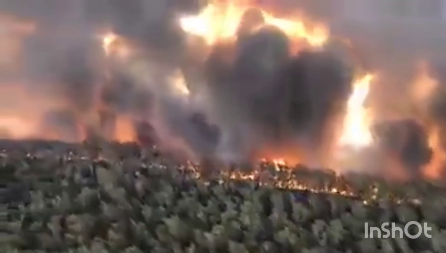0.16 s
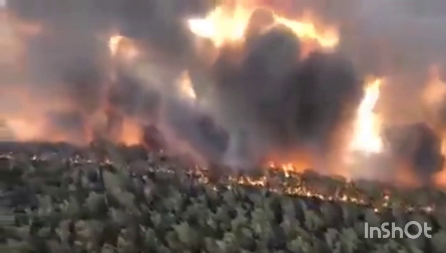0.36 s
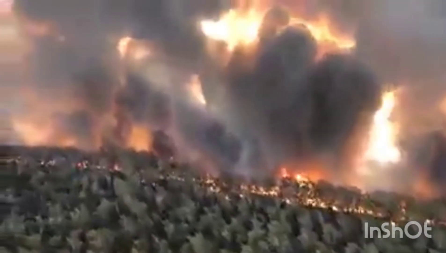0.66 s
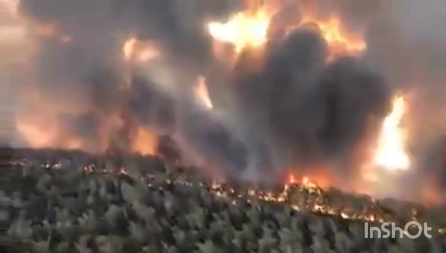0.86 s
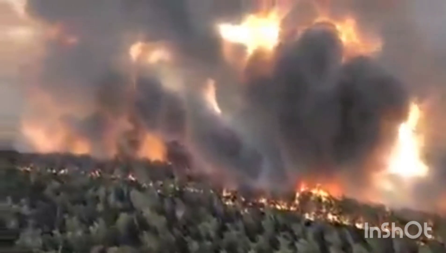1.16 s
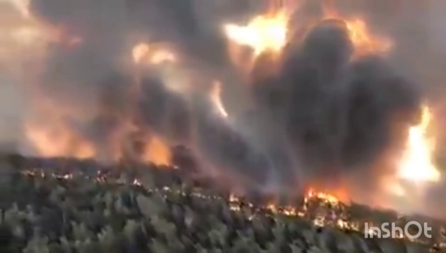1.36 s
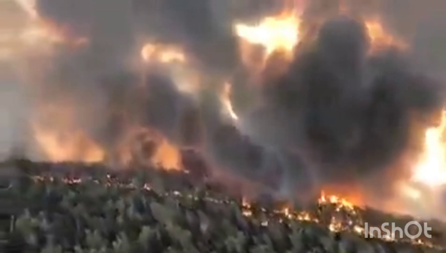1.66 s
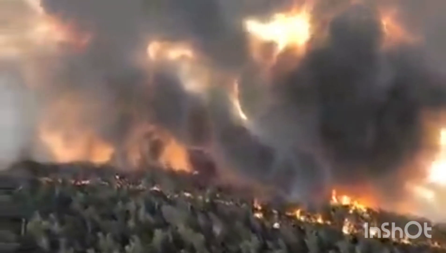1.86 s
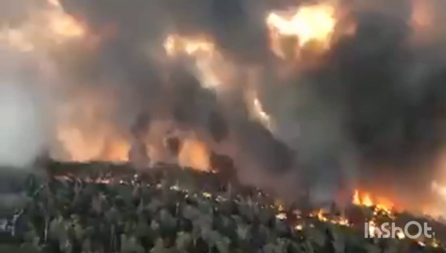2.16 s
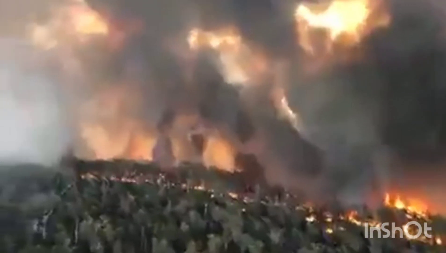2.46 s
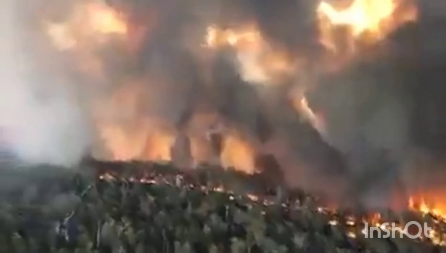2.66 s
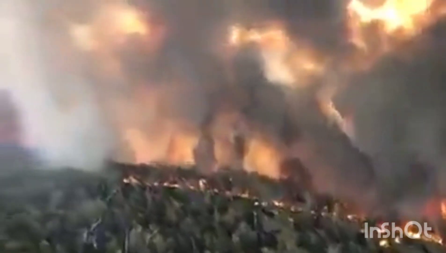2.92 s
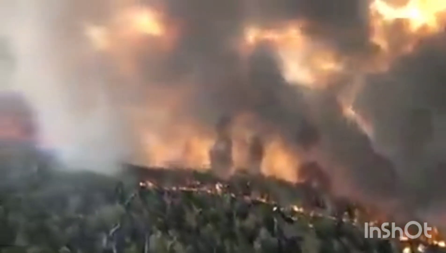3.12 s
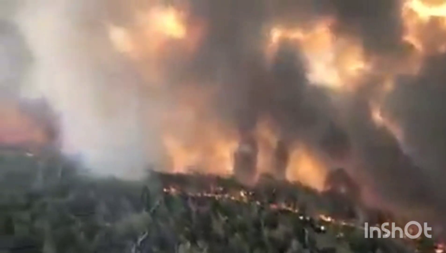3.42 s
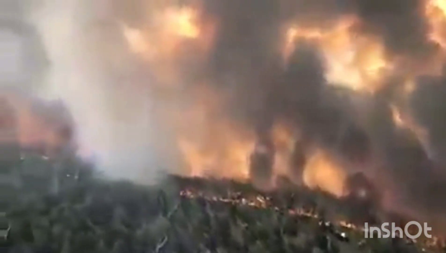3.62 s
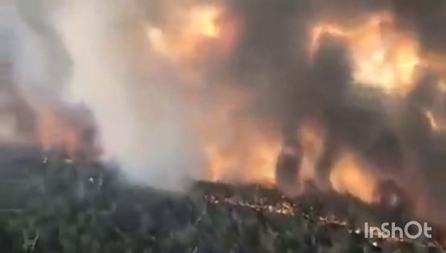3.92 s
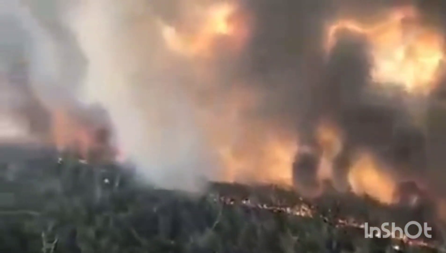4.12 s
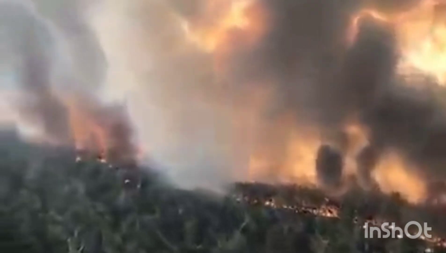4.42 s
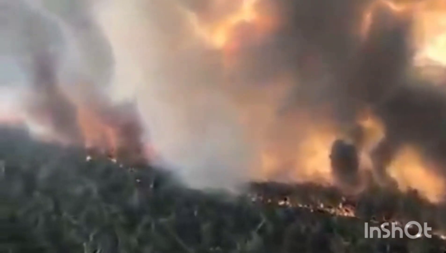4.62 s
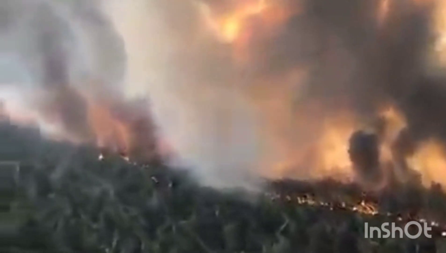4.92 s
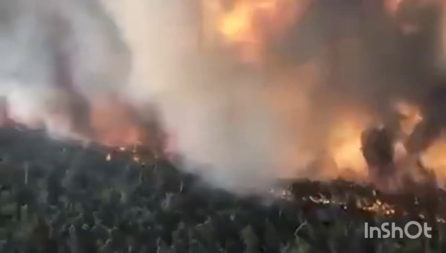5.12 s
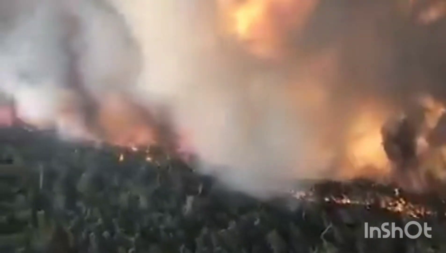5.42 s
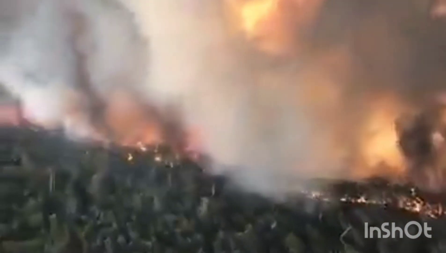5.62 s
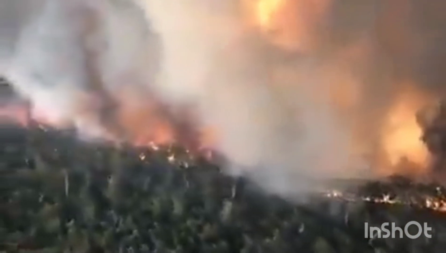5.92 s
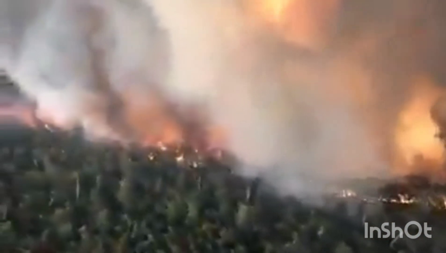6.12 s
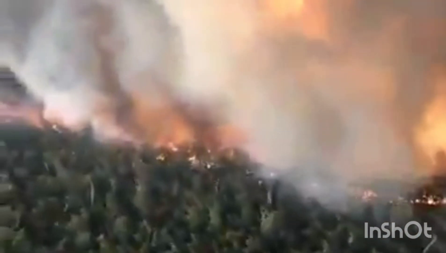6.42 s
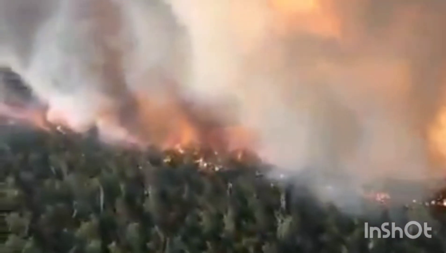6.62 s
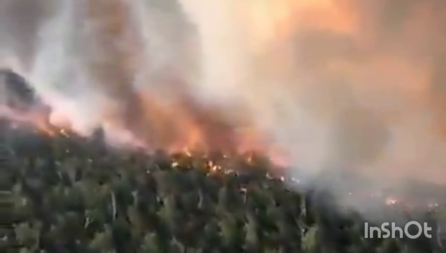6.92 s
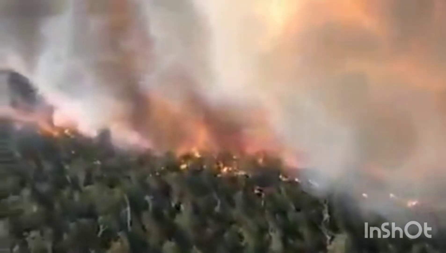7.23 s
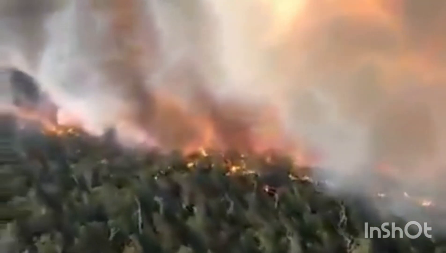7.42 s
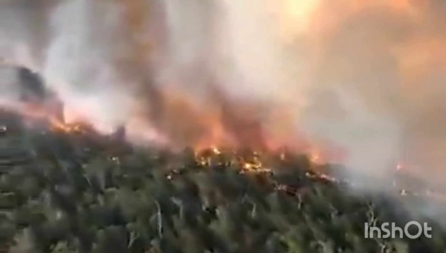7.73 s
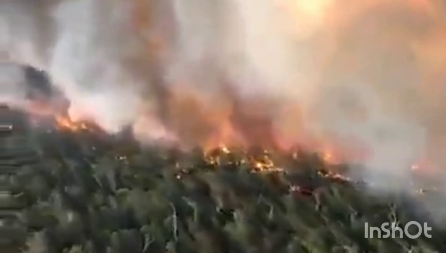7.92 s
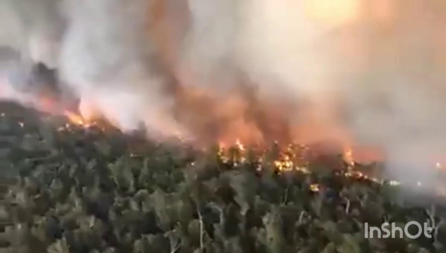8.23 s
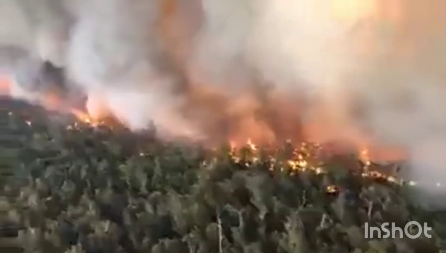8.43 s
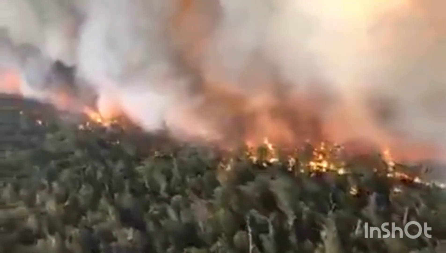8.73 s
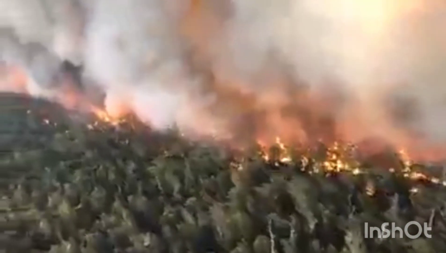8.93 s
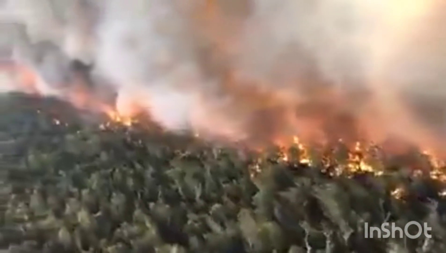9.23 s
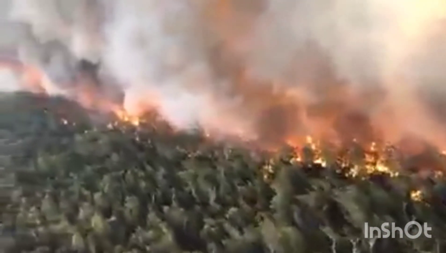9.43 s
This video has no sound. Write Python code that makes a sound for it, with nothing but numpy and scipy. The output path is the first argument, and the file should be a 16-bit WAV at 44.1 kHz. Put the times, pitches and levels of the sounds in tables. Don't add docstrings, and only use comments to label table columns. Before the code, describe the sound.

Helicopter blades slap rapidly out of the distance, swell into a roaring, droning overhead pass, fade, then the same approach begins again, overloaded and muffled.

```python
import sys
import numpy as np
from scipy import signal
from scipy.fft import rfft, irfft
from scipy.io import wavfile
from scipy.ndimage import uniform_filter1d, map_coordinates

SR = 44100
rng = np.random.default_rng(int(sys.argv[2]) if len(sys.argv) > 2 else 0)


def unload_audio(sound):
    columns = np.transpose(np.atleast_2d(sound))
    steps = np.round(np.clip(columns, -1, 1) * 32767)
    wavfile.write(sys.argv[1], SR, steps.astype(np.int16))


def gain_from_decibels(decibels):
    exponent = np.asarray(decibels, float) / 20
    return 10 ** exponent


N = 422037
TIME = np.arange(N) / SR
BAND_HZ = 4330
MERGE_DB, MERGE_S, MERGE_WIDTH_S = -3, 4.5, 0.45

# start_s, peak_db, ring_hz
FAR_SLAPS = [(0.029, -12, 410), (0.092, -0.5, 322), (0.166, -12.5, 700), (0.224, 3.5, 309), (0.3, -3, 361),
             (0.362, -6.5, 317), (0.408, -17.5, 361), (0.493, -2.5, 289), (0.559, -12, 267),
             (0.614, -8.5, 424), (0.7, -10.5, 351), (0.765, -7, 307), (0.827, -1, 372), (0.904, -4, 429),
             (0.97, -2, 431), (1.035, 1.5, 392), (1.103, 1, 336), (1.178, -3, 435), (1.244, 0, 375.5),
             (1.306, -1, 361), (1.374, -9.5, 309), (1.451, 2.5, 438), (1.517, -5, 433), (1.587, -1.5, 416),
             (1.649, 4.5, 311), (1.724, -4.5, 709.5), (1.781, 10, 334), (1.848, 0.5, 348.4),
             (1.922, 0, 401), (1.992, -3, 456)]
# time_s, level_db
NEARNESS = [(0.0, -38), (0.15, -35.5), (0.32, -32.5), (0.67, -27.5), (0.85, -30), (1.4, -25), (1.68, -22),
            (1.93, -23.5), (2.25, -23), (3.08, -17), (3.37, -17), (3.98, -14), (4.58, -11), (4.78, -13),
            (4.93, -13), (5.13, -11.5), (5.3, -28), (5.45, -21)]
# freq_hz, density_db_per_hz
ROAR_SPECTRUM = [(12, -37), (20, -18), (71, 0), (226, -4.5), (290, -2), (381, -3.5), (572, -13),
                 (686, -14.5), (1210, -19), (1420, -17), (2080, -24.5), (4110, -41.5), (4500, -55),
                 (5850, -85), (9900, -120)]
# time_s, rms_db
TAIL_THIRD = [
    (2.6, -29.5),
    (3.1, -22),
    (3.5, -18.5),
    (3.9, -13.5),
    (4.15, -12),
    (4.6, -8.5),
    (5.0, -9),
    (5.2, -15),
    (5.45, -35.5),
]
# multiple, level_re_third_db
TAIL_OTHERS = [(2, -22), (5, -10), (6, -20), (7, -15.5), (8, -12.5)]
# time_s, ceiling_db
OVERLOAD = [
    (0, -10),
    (.4, -9.5),
    (.75, -1.4),
    (1.0, -1.0),
    (1.07, 2.6),
    (1.15, .1),
    (2.2, 0.35),
    (4.96, 1.5),
    (5.2, -2.5),
    (5.45, -11.5),
]
# edge_hz, step_db
TREBLE_STEPS = [(2720, -2), (3750, -2)]
# time_s, layer_db, leader_db
LAYER_LEVEL = [
    (1.6, -28.5, -1),
    (1.85, -4, -2),
    (2.7, -3, -2.5),
    (4, -2.5, -2.5),
    (4.94, -3, -2.5),
    (5.3, -6, 1.5),
]


def curve(table):
    time_s, *columns = np.transpose(table)
    return [np.interp(TIME, time_s, c) for c in columns]


def unit(x):
    return x / np.sqrt(np.mean(x ** 2))


def band(x, lo_hz, hi_hz, order=2):
    return signal.sosfilt(signal.butter(order, [lo_hz, hi_hz], "band", fs=SR, output="sos"), x)


def walk(rate_hz):
    hold = int(SR / rate_hz)
    steps = np.repeat(rng.standard_normal(N // hold + 1), hold)
    return 1.296 * uniform_filter1d(uniform_filter1d(steps, hold), hold)[:N]


def add(out, start_s, grain):
    i = max(int(start_s * SR), 0)
    out[i:i + len(grain)] += grain[:N - i]


def bump(at_s, width_s, time_s=TIME):
    return np.exp(-((time_s - at_s) / width_s) ** 2)


def doppler(pass_s, width_s, depth):
    return 1 - depth * (TIME - pass_s) / np.hypot(TIME - pass_s, width_s)


def blades(count=43):
    start_s, peak_db, ring_hz = np.transpose(FAR_SLAPS)
    chance = rng.standard_normal((len(start_s) + count, 5)).T
    late, other, tone = chance[:3, len(start_s):]
    since_s = 0.0677 * np.arange(count)
    start_s = np.append(start_s, 2.053 + since_s + 0.005 * late)
    peak_db = np.append(peak_db, 3 - 0.37 * since_s - 2.5 * late + 2.0 * other)
    ring_hz = np.append(ring_hz, 350.6 * np.exp(0.12 * (late + tone) - 0.13 * since_s))
    merge_db = MERGE_DB * bump(MERGE_S, MERGE_WIDTH_S, start_s)
    crack_db = -13 + merge_db - 23.5 * np.exp(-start_s / 0.38) + 3 * chance[3]
    thump_db = -10 - 11.5 * np.exp(-start_s / 0.36) + 4.5 * chance[4]
    thump_db += -5.5 * bump(3.9, 0.97, start_s)
    return np.transpose([start_s, peak_db + merge_db, ring_hz, crack_db, thump_db])


def crack_air():
    air = unit(band(rng.standard_normal(N), 710, 1600, order=1))
    return signal.sosfilt(signal.ellip(6, 0.5, 14, 2720, fs=SR, output="sos"), air)


def main_rotor(beats, behind_s, spread):
    out, crack, gust = np.zeros(N), np.zeros(N), np.zeros(N)
    t = np.arange(2600) / SR
    chance = rng.standard_normal((len(beats), 6))
    stumble = walk(350)
    for (start_s, peak_db, hz, crack_db, thump_db), c in zip(beats, chance):
        start_s += behind_s * (1 + 0.4 * c[5])
        hz = hz * np.exp(spread * c[2]) * (330 / hz) ** (4 * spread)
        i = int(start_s * SR)
        pitch_stumble = stumble[i:i + len(t)]
        level_stumble = stumble[::-1][i:i + len(t)]

        hold_s = 0.0095 * np.exp(0.2 * c[0])
        shape = (1 - np.exp(-t / 0.0012)) * np.exp(-(t / hold_s) ** 2.25)
        cycle_hz = hz * (1.12 - 9.75 * t) * (1 + 0.1794 * pitch_stumble)
        turns = np.cumsum(cycle_hz) / SR + 0.3 * c[1]
        ring = np.sin(2 * np.pi * turns)
        ring += 0.44 * np.sin(2 * np.pi * (1.9 + 0.25 * c[2]) * turns)
        ring *= gain_from_decibels(4.0 * level_stumble)
        add(out, start_s - 0.001, gain_from_decibels(peak_db + 2.25) * shape * ring)

        echo = shape * np.sin(2 * np.pi * 0.787 * turns)
        add(out, start_s + 0.016 + 0.00404 * c[3], gain_from_decibels(peak_db - 7.5) * echo)

        late_s = t - 0.016 - 0.0015 * c[4]
        thump = np.exp(-(late_s / 0.007) ** 2) * np.cos(2 * np.pi * 72 * late_s - 0.5)
        add(out, start_s, gain_from_decibels(thump_db + 5.5) * thump)

        burst = (t / 0.0083) ** 1.55 * np.exp(-t / 0.0062)
        add(crack, start_s - 0.006, gain_from_decibels(crack_db + 6.5) * burst)
        push = (1 - np.exp(-t / 0.00096)) * np.exp(-t / 0.015)
        add(gust, start_s - 0.004, push)
    return out + crack * crack_air(), gust


def turbulence():
    hz, density_db = np.transpose(ROAR_SPECTRUM)
    shared, groups = walk(9), np.zeros((5, N))
    for f in 24 * 2 ** np.arange(0, 7.6, 1 / 3):
        db = np.interp(np.log(f), np.log(hz), density_db) + 10 * np.log10(f)
        noise = unit(band(rng.standard_normal(N), f / 1.13, f * 1.13))
        group = np.searchsorted([110, 500, 1500, 2800], f)
        groups[group] += gain_from_decibels(db + 1.2 * shared + 1.5 * walk(18)) * noise
    return np.array([unit(g) for g in groups])


def roar(air, gust):
    sub, low, mid, high, top = air
    overhead = bump(MERGE_S, MERGE_WIDTH_S)
    gust = gust * (1 - 0.64 * overhead)
    mid_db = curve(NEARNESS)[0] + 1.5 * overhead

    knee_db, low_top_db = 6.5, -9
    low_db = -knee_db * np.logaddexp(-(mid_db + 11.5) / knee_db, -low_top_db / knee_db)

    past_s = np.maximum(TIME - 4.95, 0)
    high_db = -11 + 0.79 * mid_db - 7.5 * np.minimum(past_s / 0.069, 1) - 20 * past_s
    high = high + gain_from_decibels(-11 - 0.15 * (mid_db + 17.5) + 2.0 * gust) * top

    out = gain_from_decibels(-22 + 2.6 * gust) * sub * np.clip(0.5 + TIME / 4.1, 0, 1)
    out += gain_from_decibels(low_db + 7.7 * gust - 1.8) * low
    out += gain_from_decibels(mid_db + 11.0 * gust - 3.0) * mid
    return out + gain_from_decibels(high_db + 4.8 * gust) * high


def gearbox():
    mesh_hz = 1172 * doppler(4.86, 0.12, 0.031)
    db = -12.5 + 1.14 * curve(NEARNESS)[0] + 5.5 * bump(4.68, 0.25)
    turns = np.cumsum(mesh_hz * (1 + 0.02596 * walk(60))) / SR
    level = gain_from_decibels(db + 7.5 + 3.6 * walk(22)) * np.clip(TIME / 0.25, 0, 1)
    return level * np.sin(2 * np.pi * turns)


def tail_rotor():
    third_db, = curve(TAIL_THIRD)
    first_db = np.minimum(-21, third_db)
    fourth_db = third_db - 3 - 10 * bump(4.15, 0.31)
    lines = [(1, first_db), (3, third_db), (4, fourth_db)]
    lines += [(k, third_db + db) for k, db in TAIL_OTHERS]

    blade_hz = 58.56 * doppler(4.85, 0.444, 0.024)
    turns = np.cumsum(blade_hz * (1 + 0.011 * walk(14))) / SR
    out = np.zeros(N)
    for k, db in lines:
        out += gain_from_decibels(db + 1.9 * walk(16)) * np.sin(2 * np.pi * (k * turns + rng.random()))
    return gain_from_decibels(4.5) * np.clip(TIME - 2.4, 0, 1) * out


def first_recorder(x, knee=3.8):
    top = gain_from_decibels(curve(OVERLOAD)[0])
    flat = x / (1 + np.abs(x / top) ** knee) ** (1 / knee)
    dull = signal.butter(2, 2100, fs=SR, output="sos")
    flat = x + signal.sosfiltfilt(dull, flat - x)
    hz = np.arange(N // 2 + 1) * SR / N
    loss_db = sum(db * (hz > edge_hz) for edge_hz, db in TREBLE_STEPS)
    flat = irfft(rfft(flat) * gain_from_decibels(loss_db), N)
    return signal.sosfilt(signal.ellip(12, 0.3, 95, BAND_HZ, fs=SR, output="sos"), flat)


def second_flyby(leader, layer):
    lag_s, slip_at_s, slip_s, layer_lag_s = 4.6235, 2.76, -0.004, 4.644
    source_s = TIME - lag_s
    source_s = source_s - slip_s * np.clip((source_s - slip_at_s) / 0.08 + 0.5, 0, 1)
    again = map_coordinates(leader, [source_s * SR], order=3)
    again += np.roll(layer, int(layer_lag_s * SR)) * (source_s > 1)

    since_s = source_s - 0.301
    db = -0.5 + 0.25 * (since_s - 1)
    db += -10.5 * np.clip(1 - since_s / 0.3, 0, 1)
    db += -68 * np.maximum(source_s - 4.862, 0)
    return again * np.clip(since_s / 0.03, 0, 1) * gain_from_decibels(db)


def scene():
    layer_db, leader_db = curve(LAYER_LEVEL)
    air = turbulence()
    beats = blades()
    slaps, gust = main_rotor(beats, 0, spread=0)
    leader = slaps + roar(air, gust) + tail_rotor() + gearbox()
    leader = gain_from_decibels(leader_db) * first_recorder(leader)

    slaps, gust = main_rotor(beats, 0.007, spread=0.13)
    layer = first_recorder(slaps + roar(np.roll(air, SR, axis=1), gust))
    layer *= gain_from_decibels(layer_db) * (TIME > LAYER_LEVEL[0][0])

    leaves = np.clip((5.45 - TIME) / 0.12, 0, 1)
    leaves *= gain_from_decibels(np.interp(TIME, [4.96, 4.97], [0, -2]))
    return ((leader + layer) * leaves + second_flyby(leader, layer))[None]


def top_cut(x):
    return signal.sosfilt(signal.butter(12, 15750, fs=SR, output="sos"), x)


def record(dry):
    clipped = np.clip(dry + 0.0012, -0.93, 0.93)
    above = signal.butter(8, BAND_HZ, "high", fs=SR, output="sos")
    spray = signal.sosfilt(above, clipped - dry)
    window = np.hanning(2200)[None] ** 2 / 825
    puffs = np.sqrt(np.abs(signal.oaconvolve(spray ** 2, window, "same")))
    hiss = band(rng.standard_normal(N), 3000, 4500, order=1)
    hiss = unit(band(hiss, BAND_HZ, 15500, order=6))
    return top_cut(clipped + gain_from_decibels(-8.5) * puffs * hiss)


dry = scene()
out = record(dry)
unload_audio(out)
```